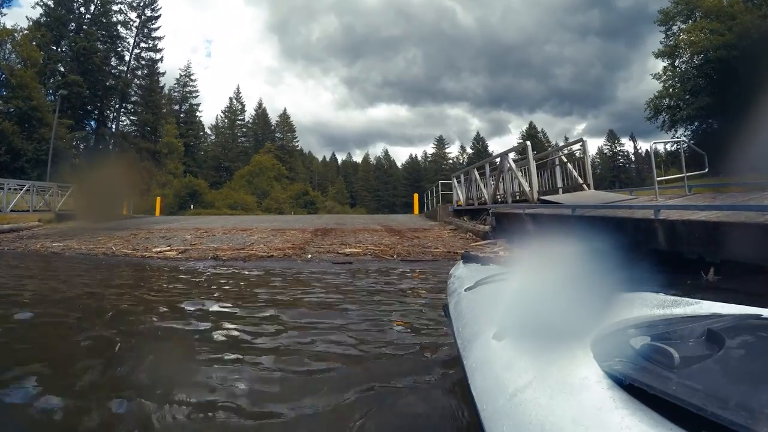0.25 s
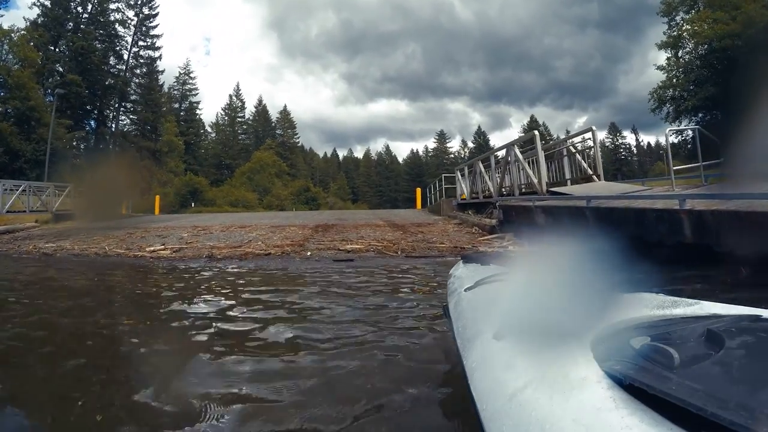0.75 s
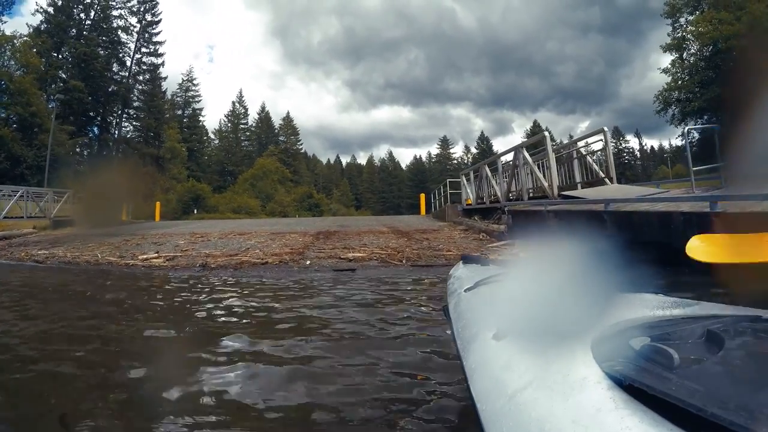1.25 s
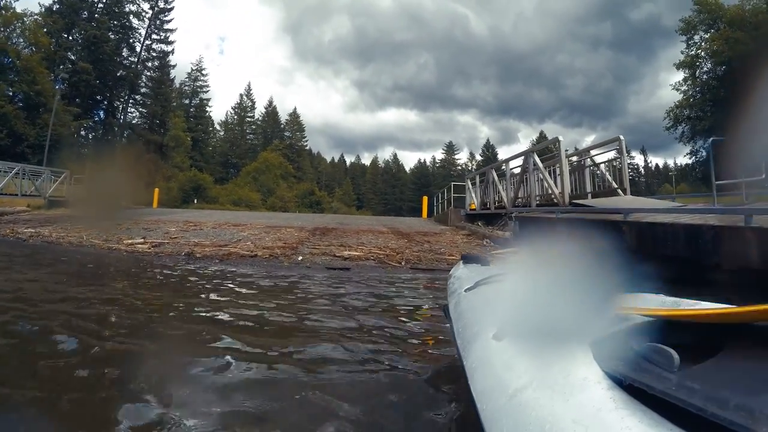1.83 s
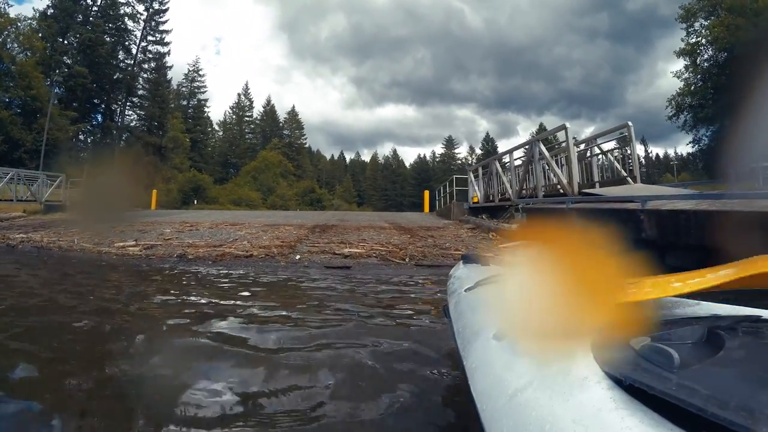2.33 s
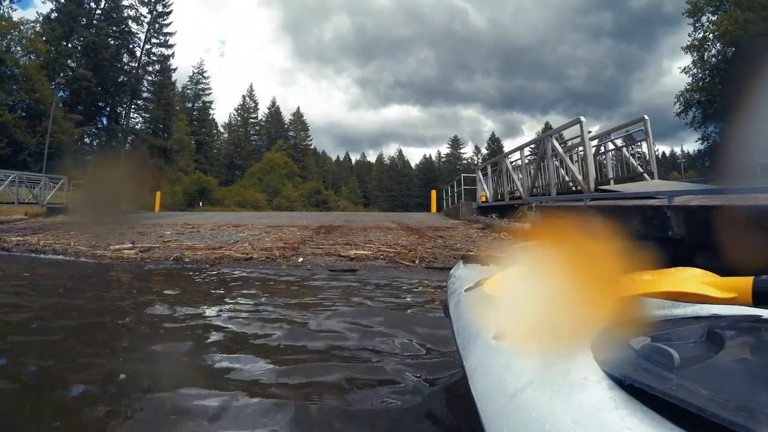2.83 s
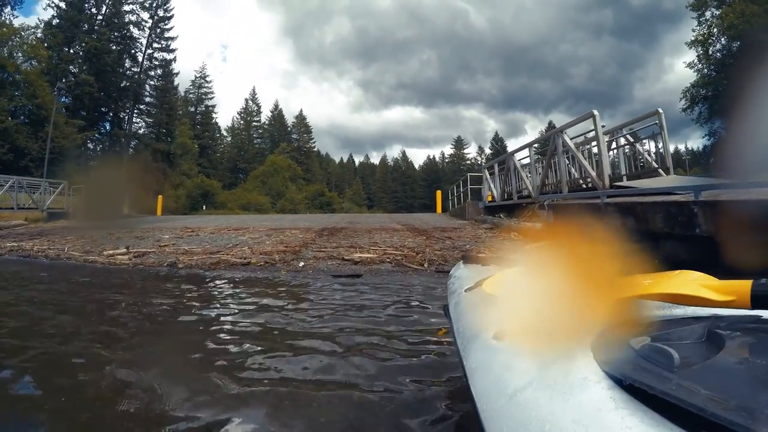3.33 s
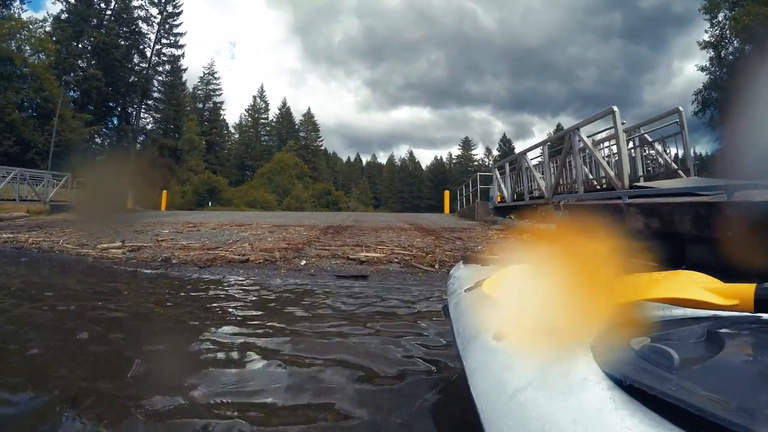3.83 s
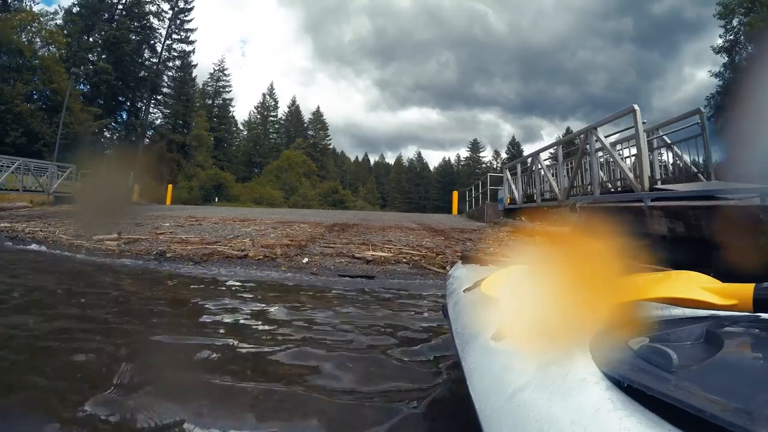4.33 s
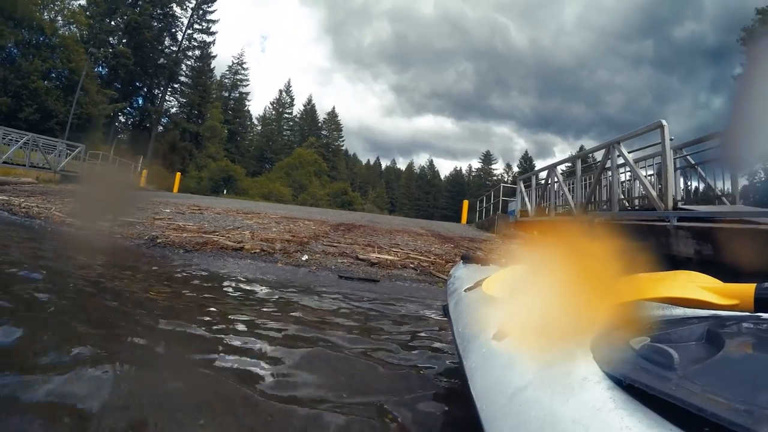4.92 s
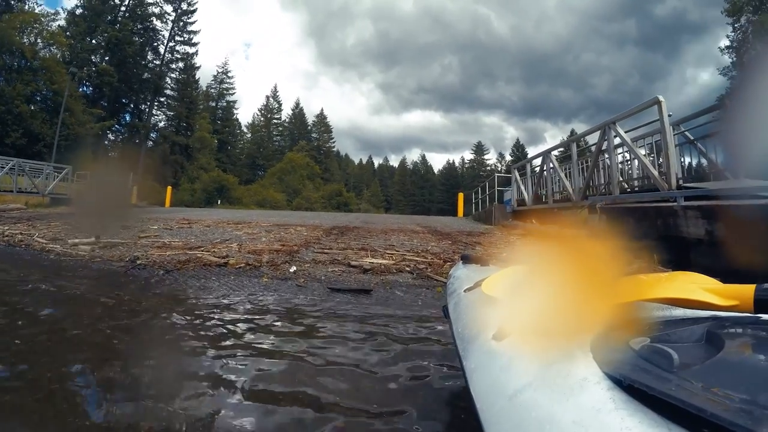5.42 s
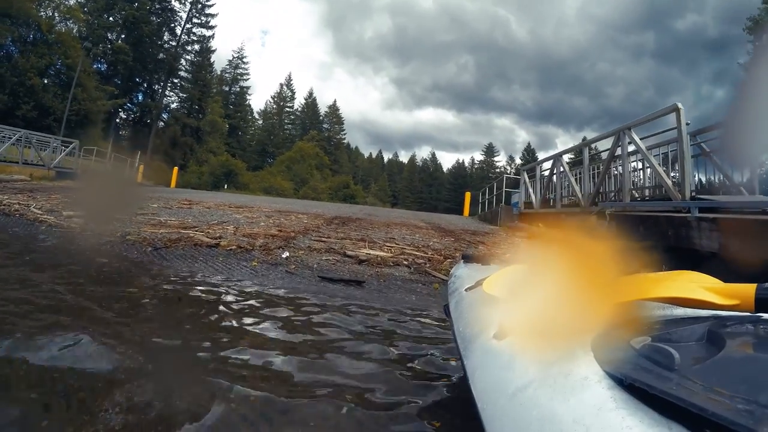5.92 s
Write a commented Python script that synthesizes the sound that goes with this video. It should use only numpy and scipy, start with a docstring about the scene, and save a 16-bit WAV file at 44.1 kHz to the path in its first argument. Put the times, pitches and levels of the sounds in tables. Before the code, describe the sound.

Hollow knocks and thumps on a plastic kayak hull over a deep rumble, with water lapping, trickling and one small splash.

```python
"""A hollow plastic kayak beside a dock, knocked by ripples and a paddle, heard from right on the hull.
Each blow rings the belly and rattles the deck, and the sound comes up through the microphone's mount,
which sways at a deep pitch. Close by, water laps and trickles along the side, and near the end a small
splash falls back in drops. Under it all lies the microphone's faint hiss.
One microphone feeds both channels; the right one comes late."""
import sys
import numpy as np
from scipy import signal
from scipy.fft import rfft, irfft, next_fast_len
from scipy.io import wavfile
from scipy.ndimage import uniform_filter1d, minimum_filter1d, map_coordinates

SR = 44100
rng = np.random.default_rng(int(sys.argv[2]) if len(sys.argv) > 2 else 0)


def wrap_up_sound(samples):
    """Save the sound to the file named by the first command line argument, as 16-bit audio."""
    columns = np.atleast_2d(samples).T
    # keep every value between -1 and 1, then stretch to whole-number steps
    tamed = np.clip(columns, -1, 1)
    steps = np.round(tamed * 32767).astype(np.int16)
    wavfile.write(sys.argv[1], SR, steps)


N = 272361

# The water along the side. Each row: time in seconds, then lapping, wash and fizz levels in dB.
WATER_LEVELS = [(0.0, -52, -69, -69.5), (0.58, -61, -71, -68.5), (0.84, -28, -55.5, -65.5),
                (1.0, -46.5, -62, -66), (1.5, -52, -62.5, -68.5), (1.7, -32, -53.5, -65),
                (2.1, -32, -58, -67), (2.35, -33, -53, -66), (2.55, -32.5, -53.5, -62),
                (2.77, -51, -48.5, -60.5), (3.12, -26.5, -50.5, -65.5), (3.4, -48.5, -67, -67),
                (3.75, -43, -50.5, -67.5), (4.04, -46.5, -62.5, -68), (4.23, -50, -58, -60),
                (4.35, -44.5, -53.5, -67.5), (4.54, -24.5, -54.5, -60), (4.78, -48, -51.5, -65.5),
                (4.97, -41, -47, -70.5), (5.16, -28.5, -54, -69), (5.28, -47, -59.5, -69),
                (5.66, -33.5, -45, -64), (5.76, -43, -50, -59), (5.9, -46.5, -58, -63.5),
                (6.18, -37, -49.5, -68)]


def hull():
    """Each blow shoves the hull, rings its low modes, rattles the deck, slaps and cracks."""
    # Each row: start in seconds, relative level in dB, thud in dB relative to that, spot struck
    # (0 deep belly to 2 thin wall), brightness in dB per octave, relative crack in dB,
    # rattle t60 in seconds (held to 15-300 ms below).
    blows = [(0.04, -52, 4.5, 1.9, -8, -31, 0.029), (0.153, -65, 8, 0, 0, -24, 0.05),
             (0.57, -58, 16.5, 0.62, -22, -19, .049), (0.66, -50, 20.5, 0.63, -2, -29, .07),
             (0.762, -37, 3.5, 0.99, 1, -46, 0.018), (0.802, -4.5, 2, 1.63, -1.5, -46.5, 0.037),
             (0.868, -43.5, 13.5, 0, -1, -32, 0.098), (0.939, -59, 19, 0, -6, -26, 0.034),
             (1.076, -21.5, -2, 1.66, -7.5, -41, 0.031), (1.478, -34, 10.5, 0.73, -3, -17, 0.22),
             (1.534, -18.5, 13, 1.1, -1.5, -30, 0.077), (1.567, -27.5, 16, 1, -3, -38, 0.079),
             (1.621, -11, 7.5, 1.87, -3.5, -36, 0.061), (1.665, -28.5, 3, 0, -5, -31, 0.051),
             (1.723, -35.5, 7, 0.026, 3, -36, 0.043), (1.776, -41, 7.5, 1, 9, -41, 0.071),
             (1.854, -13, 7, 0.96, -0.5, -39.5, 0.073), (1.928, -42, 22.5, 1.4, 14, -14.5, 0.074),
             (1.957, -19.5, 6, 0.88, -3.5, -52, 0.043), (2.056, -30.5, 9.5, 1.2, 1.5, -19, 0.13),
             (2.13, -19.5, 3, 1.24, 2, -30.5, 0.046), (2.178, -36, 16.5, 1.2, -4, -26.5, 0.11),
             (2.208, -25, 5.5, 0.99, -3, -38, 0.057), (2.252, -40, 12.5, 1, -8.5, -44, .07),
             (2.507, -41, 9.5, 1, -4.5, -26.5, 0.046), (2.53, -45.5, 12, 0, -1, -25, 0.12),
             (2.601, -28, 13, 1.5, -1.5, -44, 0.085), (2.661, -34, 20, 0.55, -2.5, -41, 0.031),
             (3.034, -35.5, 5, 0.73, -5.5, -46, 0.096), (3.165, -37, 12, 2, -4.5, -45, 0.047),
             (3.268, -51, 17.5, 2, -7, -29, 0.28), (3.664, -10, 10.5, 1.64, -4, -44, 0.073),
             (3.718, -3, 1, 1.63, .5, -42, 0.04), (3.779, -32, 10.5, 0.76, 0, -42, 0.1),
             (3.828, -47, -11, 2, 0.5, -35, 0.17), (3.912, -46, 3, 2, -5, -41, 0.083),
             (4.312, -43.5, 13.5, 1, -3, -39, 0.06), (4.394, -22, 19, 1.44, -2.5, -62, 0.09),
             (4.42, -33.5, 9, 0.24, 3.5, -59, 0.095), (4.465, -14, 3, 1.67, 2, -49.5, 0.063),
             (4.527, -23.5, 8.5, 2, -1.5, -63, 0.05), (4.557, -19, -6, 2, -3, -53, 0.047),
             (4.648, -36, -6, 2, 11, -44, 0.048), (5.075, -41, 22, 0.72, -3, -30.5, 0.033),
             (5.175, -43, 15, 0.95, -2.5, -38, 0.068), (5.537, -39.5, 16, 2, -3.5, -14, 0.33),
             (5.803, -42.5, 7, 0.35, 2.5, -17, 0.06), (5.949, -38.5, -4.5, 2, 4, -38, 0.0097)]
    # The hull's low modes. Each row: pitch in Hz, t60 in seconds.
    belly_modes = [(108, 0.25), (178, 0.14), (232, 0.12)]
    # Spectra of the dull shove, the crack and the slap. Each row: frequency in Hz, density in dB.
    shove_spectrum = [(30, -29.5), (55, 16), (90, 3), (200, 9), (330, -9.5), (500, -62)]
    crack_spectrum = [(2200, -31.5), (3500, -4.5), (5200, 6), (6200, -7), (7400, 4), (9500, -7),
                      (12000, -11.5), (15500, -16.5)]
    slap_spectrum = [(1300, -41), (2300, 5), (2800, 0.5), (3500, -2.5), (4500, -13), (7000, -28),
                     (12000, -60)]
    out, t = np.zeros(N + SR), np.arange(SR // 3) / SR
    plastic = signal.butter(N=8, Wn=1930, fs=SR, output="sos")  # the thick wall passes little treble
    rise, swell = 1 - np.exp(-t / 0.00048), 1 - np.exp(-t / 0.0055)
    for start, db, thud_db, spot, bright_db, crack_db, t60 in blows:
        t60 = np.clip(t60, 0.015, 0.3)
        # Modes fade with distance from the spot struck; the deepest answers more readily.
        modes_db = thud_db - 12.5 * np.abs(np.arange(len(belly_modes)) - spot) + [1.5, 0, 0]
        ring = sum(amp(level) * decay(t, life) * np.sin(2 * np.pi * hz * rng.normal(1, 0.021) * t)
                   for level, (hz, life) in zip(modes_db, belly_modes))
        shove = noise(len(t), shove_spectrum) * amp(max(modes_db) - 8.5) * decay(t, 0.19)
        thud = (ring + shove) * swell
        bounces = np.r_[1, 1, rng.standard_normal(198)]  # the contact bounces, 300 steps a second
        chatter = amp(5 * np.interp(t * 300, np.arange(200), bounces))
        fade = decay(t, t60) + amp(-24.5) * decay(t, 0.22)  # first decay, then a weaker tail
        stir = rng.standard_normal(len(t)) * rise * np.sqrt(chatter) * fade
        deck = signal.sosfilt(plastic, deck_resonance(stir, bright_db))
        # A small air pocket under the deck adds a hollow note.
        pocket = signal.sosfilt(plastic, filtered(stir, lambda hz: resonance(hz, 1750, width=110)))
        rattle = deck / np.linalg.norm(deck) + amp(-16.5) * pocket / np.linalg.norm(pocket)
        rattle *= np.sqrt(t60 * SR / 14)  # longer rattles carry more energy
        crack = noise(len(t), crack_spectrum) * amp(crack_db) * decay(t, 0.013)
        slap_db = -5.5 + 0.49 * crack_db + 0.6 * bright_db
        slap = noise(len(t), slap_spectrum) * rise * chatter / np.sqrt(np.mean(chatter[:900] ** 2))
        slap *= amp(slap_db) * (decay(t, 0.029) + amp(-11) * decay(t, t60))
        blow = 2.04 * thud + 2.02 * rattle + 1.06 * slap + 2.85 * crack
        out[round(start * SR):][:len(t)] += amp(db) * blow
    return out[:N]


def deck_resonance(stir, bright_db):
    """Each blow's brightness tilts the deck's resonances toward the upper or lower ones."""
    # Each row: centre in Hz, width in Hz, relative level in dB.
    deck_modes = [(311, 64, 7.5), (478.6, 45, 6), (649, 94, 7.5), (1071, 434, 6), (1201, 281, 7),
                  (1660, 150, -13.5)]
    modes = []
    for k, (centre, width, db) in enumerate(deck_modes):
        centre *= rng.normal(1, 0.029)  # every blow lands elsewhere and shifts the resonances
        gain = (-1) ** k * amp(rng.normal(db, 1.5) + bright_db * np.log2(centre / 800))
        modes.append((gain, centre, width))
    return filtered(stir, lambda hz: sum(gain * resonance(hz, *band) for gain, *band in modes))


def mount():
    """The microphone's mount swings as one slow spring; each jolt ends the old swing and starts anew."""
    # Each row: start in seconds, level of the swing in dB.
    jolts = [(0.02, -35), (.17, -28), (0.632, -24.5), (.76, -19.5), (.85, -21), (.97, -21), (1.155, -26.5),
             (1.299, -34), (1.48, -20), (1.615, -13.5), (1.72, -11.5), (1.859, -12), (1.98, -9.5),
             (2.17, -18.5), (2.285, -19), (2.39, -22), (2.531, -25.5), (2.653, -7), (2.79, -10),
             (2.87, -12.5), (3.031, -6.5), (3.15, -12), (3.329, -17), (3.48, -18), (3.661, -7),
             (3.76, -10.5), (3.86, -11.5), (3.919, -11.5), (4.11, -17.5), (4.2, -20), (4.33, -19),
             (4.411, -10.5), (4.545, -5), (4.661, -12.5), (4.986, -16), (5.15, -19.5), (5.209, -18.5),
             (5.29, -24.5), (5.46, -21.5), (5.719, -27.5), (5.79, -21), (5.95, -24.5), (6.09, -31)]
    sway_hz, rise_s, slip_cycles = 39.64, 0.017, 0.2
    out = np.zeros(N)
    cycles = sway_hz * np.cumsum(1 + 0.044 * wobble(25) + 0.02 * wobble(4)) / SR  # water jostles it
    onset = lambda t: 1 - np.exp(-(np.maximum(t, 0) / rise_s) ** 2)
    for (start, db), (end, _) in zip(jolts, jolts[1:] + [(N, 0)]):
        span = slice(round(start * SR), min(N, round((end + 3 * rise_s) * SR)))
        t = np.arange(N)[span] / SR - start
        swing = np.sin(2 * np.pi * (cycles[span] + rng.normal(0, slip_cycles)))
        handover = onset(t) * (1 - onset(t + start - end))
        out[span] += amp(db) * decay(t, t60=1) * handover * swing
    return np.sqrt(2) * amp(wobble(26)) * out  # the level flutters by about 1 dB


def water():
    """Ripples lap the belly, wash along the side and fizz, all surging together."""
    # Spectra of the three. Each row: frequency in Hz, density in dB.
    lap_spectrum = [(22, -18.5), (35, -10), (52, 1), (75, -2.5), (110, -8), (165, -11), (230, -11),
                    (340, -25.5), (450, -32), (990, -120)]
    wash_spectrum = [(210, -38), (350, -6.5), (600, -5.5), (850, -4.5), (1100, -5.5), (1300, -6),
                     (1500, -12), (1800, -14.5), (2200, -21.5), (3200, -35.5), (4200, -51.5), (7000, -120)]
    fizz_spectrum = [(1350, -28), (2300, 0), (2800, -4), (3700, -7), (4750, -6), (5600, -11.5), (7100, -17),
                     (8300, -20.5), (13600, -24), (15200, -31), (15800, -54.5)]
    lap_db, wash_db, fizz_db = curves(WATER_LEVELS)
    surge = wobble(30)
    lap = amp(lap_db + 2.5 * surge) * rush(lap_spectrum, patchy_db=1.5, lumpy_db=2.5, rate=25)
    wash = amp(wash_db + 0.52 * surge) * rush(wash_spectrum, patchy_db=3, lumpy_db=2, rate=110)
    fizz = amp(fizz_db + 0.94 * surge) * rush(fizz_spectrum, patchy_db=1.5, lumpy_db=1.5, rate=86)
    return lap + wash + fizz


def splash():
    """A small splash throws a hiss of spray close to the microphone."""
    # Each row: frequency in Hz, density in dB.
    spray_spectrum = [(1800, -45), (2200, 1), (2800, 10.5), (3600, -4.5), (4800, -2.5), (5800, -2),
                      (7000, -4.5), (8500, -18.5), (12000, -16), (15000, -17.5)]
    return amp(splash_db()) * rush(spray_spectrum, patchy_db=0, lumpy_db=-3, rate=180)


def splash_db():
    """Level of the spray: it bursts out, swells, collapses and runs off."""
    start_s, peak_s = 5.507, 5.585
    rise, fall, drain = 126, 350, 12  # dB per second
    t = np.arange(N) / SR
    burst = -44.5 - np.maximum(rise * (peak_s - t), fall * (t - peak_s))
    runoff = -62 - drain * (t - start_s)
    return np.where(t < start_s, -120, np.maximum(burst, runoff))


def drops():
    """Each drop ticks on the water and leaves a brief bubble of rising pitch."""
    # Each row: start in seconds, level in dB, bubble pitch in Hz.
    landings = [(1.205, -43.5, 2750), (1.593, -51, 6950), (1.669, -55, 6040), (1.72, -40.5, 3000),
                (2.366, -39.5, 2800), (2.963, -43, 3050), (3.252, -40.5, 2470), (4.69, -35, 2710),
                (5.508, -38, 9000), (5.516, -45, 10900), (5.529, -46, 7060), (5.598, -34, 4900),
                (5.62, -26.5, 2140), (5.652, -42, 2410), (5.678, -42, 4800), (5.691, -26, 3540),
                (5.7, -26.5, 2340), (5.71, -34, 4900), (5.735, -25.5, 2730), (5.735, -35, 6400),
                (5.775, -38, 2280), (5.842, -42.5, 7450), (5.846, -32.5, 2620), (5.854, -39, 4550),
                (5.911, -40, 2170), (5.955, -39, 2820), (5.977, -53, 6000), (5.981, -37.5, 2650),
                (6.079, -43.5, 7340)]
    out, t = np.zeros(N + SR), np.arange(SR // 20) / SR
    for start, db, hz in landings:
        envelope = decay(t, 24 / hz) * np.minimum(t * hz / 2, 1) ** 2
        bubble = np.sin(2 * np.pi * hz * t * (1 + 6 * t)) * envelope
        impact = rng.standard_normal(len(t)) * decay(t, 0.0017)
        tick = filtered(impact, lambda f: resonance(f, hz, width=4000) ** 2)
        tick_gain = 3 * amp(-14.5 + 4 * np.log2(hz / 2500))  # smaller drops tick more
        out[round(start * SR):][:len(t)] += amp(db) * (bubble + tick_gain * tick)
    return out[:N]


def trickle():
    """Tiny trickling ticks ring at four pitches, mostly the microphone cavity's resonances."""
    count, length = 900, 300  # ticks, samples in each
    when, pitch, faintness = rng.random((3, count))
    start, t = (when * N).astype(int), np.arange(length) / SR
    hz = np.array([2300, 2760, 4740, 7100])[(pitch * 4).astype(int), None]
    hz = hz * rng.normal(1, 0.06, (count, 1))
    fizz_db, spray_db = curves(WATER_LEVELS)[2][start], splash_db()[start]
    gain = (amp(fizz_db - 7) + amp(spray_db + 7)) * amp(-4 * np.log(faintness + 0.024))
    envelope = decay(t, 30 / hz) * np.minimum(t * hz / 2, 1)
    ticks = gain[:, None] * np.sin(2 * np.pi * hz * t) * envelope
    samples = start[:, None] + np.arange(length)
    return np.bincount(samples.ravel(), ticks.ravel(), N + length)[:N]


def mic_hiss():
    """The microphone's faint, steady hiss."""
    # Each row: frequency in Hz, density in dB.
    hiss_spectrum = [(710, -33), (1200, -9.5), (1710, 5), (1780, -4.5), (2620, -21), (3430, -15.5),
                     (6310, -9.5), (15500, -18.5)]
    return amp(-69.5) * rush(hiss_spectrum, patchy_db=1.5, lumpy_db=0.4, rate=30)


def amp(db):
    """Gain of a dB value."""
    return 10 ** (np.asarray(db) / 20)


def decay(t, t60):
    """A fall of 60 dB every t60 seconds."""
    return amp(-60 * t / t60)


def unit(x):
    """x at rms 1."""
    return x / np.sqrt(np.mean(x ** 2) + 1e-20)


def resonance(hz, centre, width):
    """Complex response of one damped mode, all in Hz."""
    return 1j * hz * width / (centre ** 2 - hz ** 2 + 1j * hz * width)


def curves(rows):
    """One value per sample for each column after the time."""
    times, *columns = np.transpose(rows)
    return [np.interp(np.arange(N) / SR, times, column) for column in columns]


def wobble(rate):
    """A smooth random curve, rate knots a second."""
    return map_coordinates(rng.standard_normal(int(N * rate / SR) + 4), [np.arange(N) * rate / SR])


def filtered(x, response):
    """x through a complex response of frequency."""
    size = next_fast_len(len(x) + 8192)
    return irfft(rfft(x, size) * response(np.fft.rfftfreq(size, 1 / SR)), size)[:len(x)]


def coloured(x, spectrum):
    """x shaped by (Hz, dB) points on a log axis, at rms 1."""
    freqs, db = np.transpose(spectrum)
    return unit(filtered(x, lambda hz: amp(np.interp(np.log(hz + 1), np.log(freqs + 1), db))))


def noise(length, spectrum):
    """Even, coloured noise of rms 1."""
    return coloured(rng.standard_normal(length), spectrum)


def rush(spectrum, patchy_db, lumpy_db, rate):
    """Noise of rms 1 with patches of random gain in time and frequency, and rate lumps a second."""
    bins = signal.stft(rng.standard_normal(N), nperseg=512)[2]
    patches = uniform_filter1d(rng.standard_normal(bins.shape), size=6, axis=0)
    patches = unit(uniform_filter1d(patches, size=6, axis=1))
    patchy = signal.istft(bins * amp(patchy_db * patches), nperseg=512)[1][:N]
    return coloured(patchy * amp(lumpy_db * wobble(rate)), spectrum)


def scene():
    """All sources reach the one microphone on the hull."""
    return np.tile(hull() + mount() + water() + splash() + mic_hiss() + drops() + trickle(), (2, 1))


def record(dry):
    """A limiter holds the loudest blows, the highest treble is cut and the right channel is delayed."""
    ceiling, top_hz, delay_s = 0.955, 15750, 417.5 / SR
    gain = np.minimum(1, ceiling / (np.abs(dry[0]) + 1e-9))
    limited = dry[0] * uniform_filter1d(minimum_filter1d(gain, size=441), size=441)
    left = filtered(limited, lambda hz: hz < top_hz)
    right = filtered(limited, lambda hz: (hz < top_hz) * np.exp(-2j * np.pi * hz * delay_s))
    return np.array([left, right])


dry = scene()
out = record(dry)
wrap_up_sound(out)
```